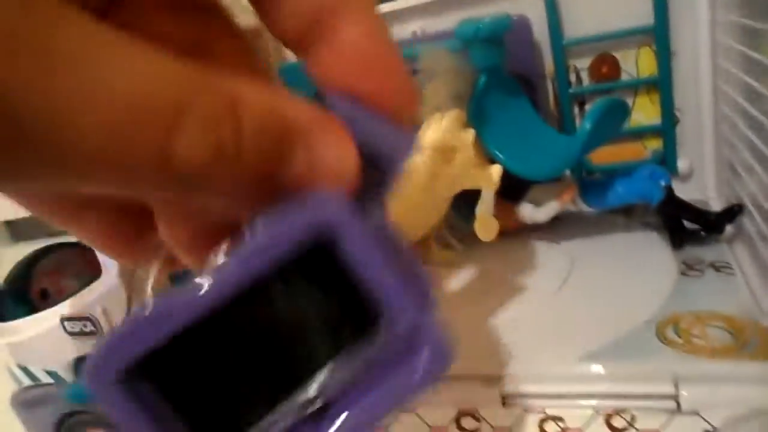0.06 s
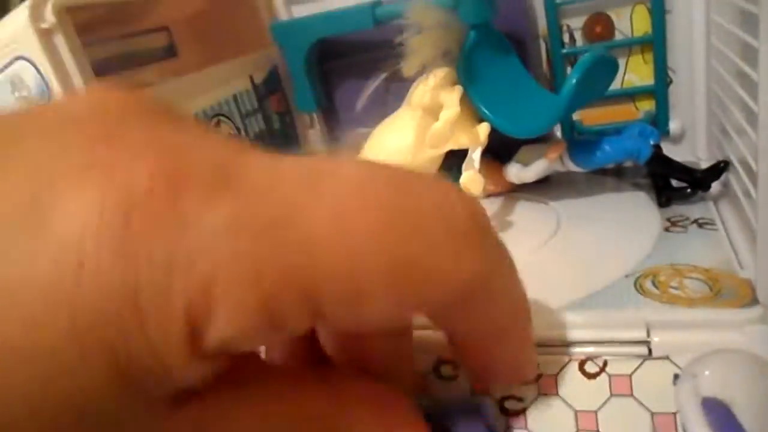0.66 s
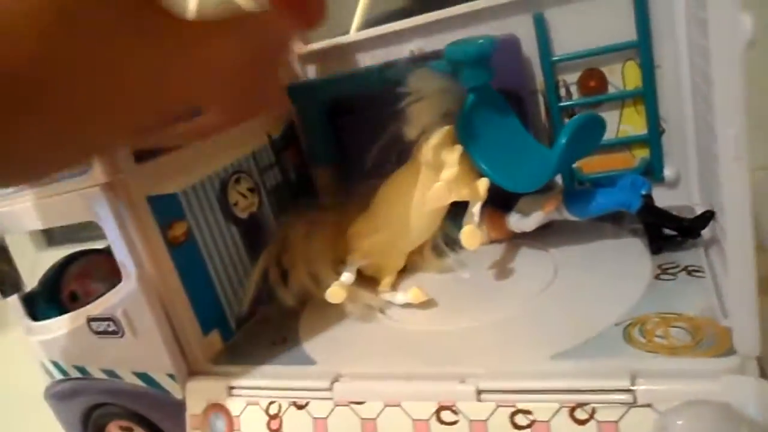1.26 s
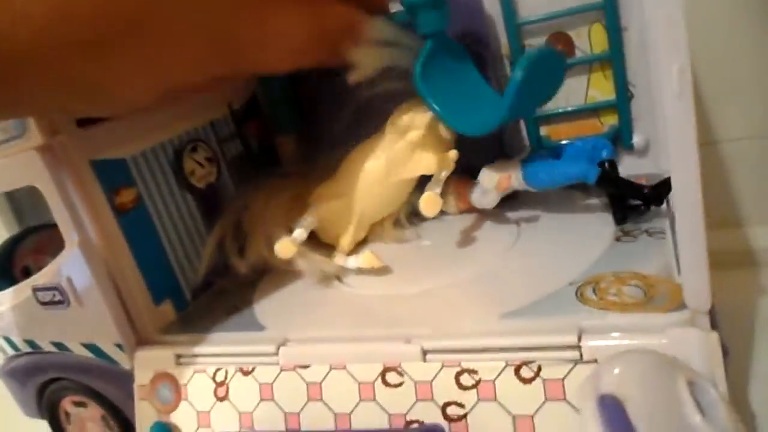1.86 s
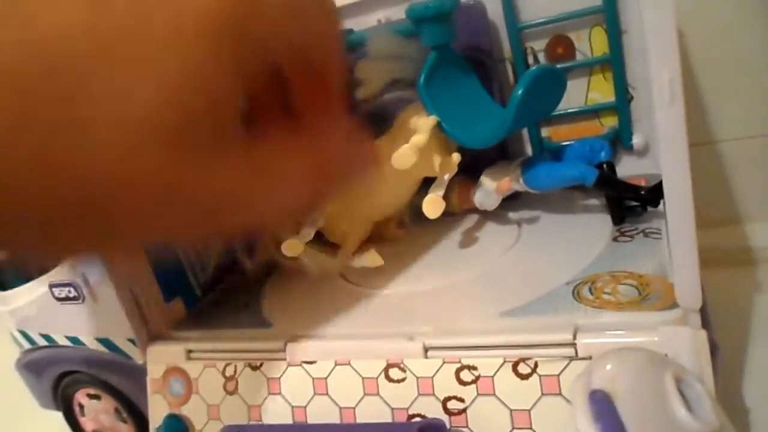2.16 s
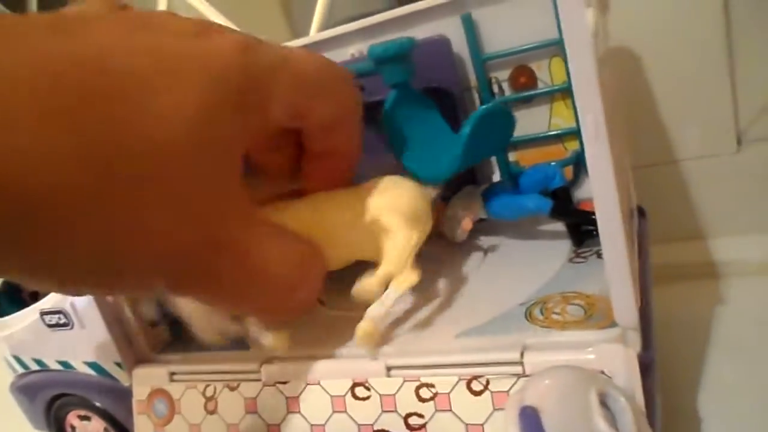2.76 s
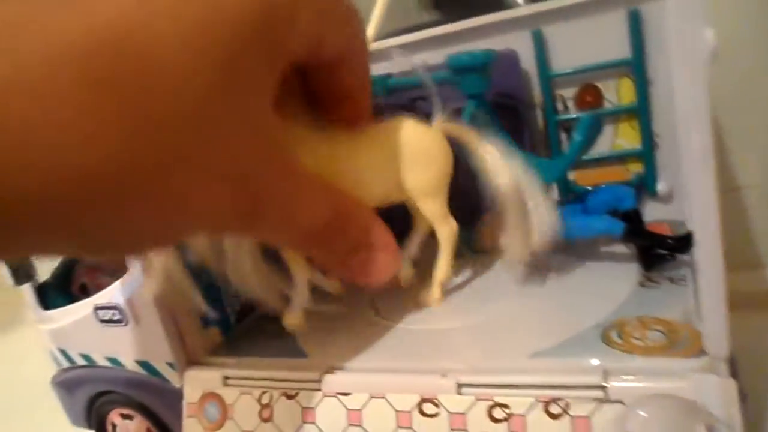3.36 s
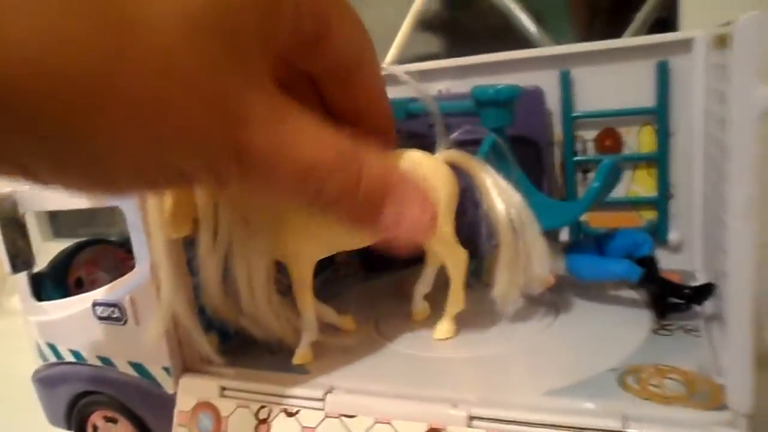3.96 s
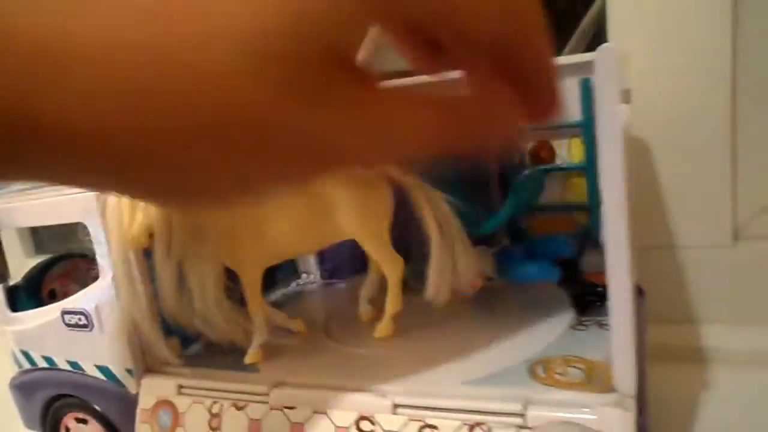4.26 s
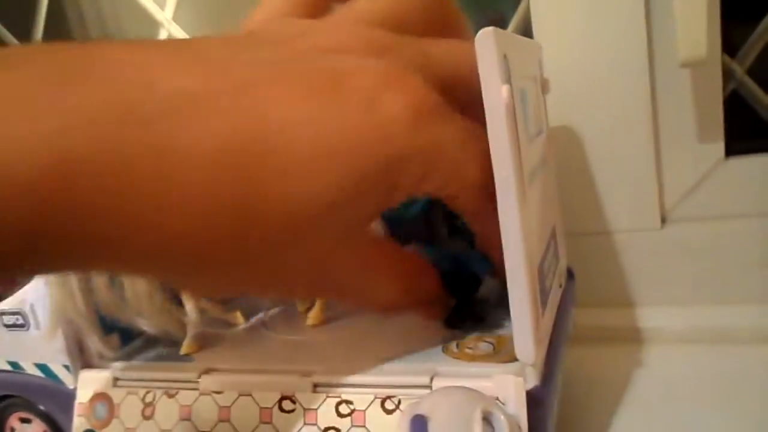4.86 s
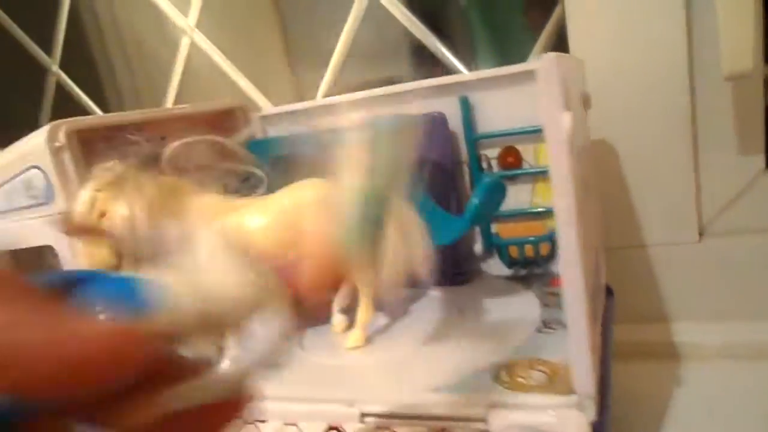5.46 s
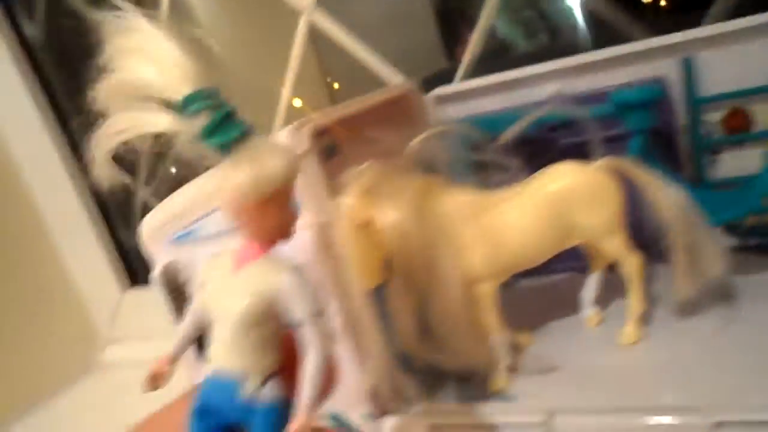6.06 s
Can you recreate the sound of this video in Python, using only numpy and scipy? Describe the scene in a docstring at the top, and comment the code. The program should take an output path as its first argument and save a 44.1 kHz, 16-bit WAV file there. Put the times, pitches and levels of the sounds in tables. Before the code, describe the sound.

Hard plastic toys click, knock and scrape lightly in short clusters as a hand moves them inside a hollow toy trailer.

```python
"""A small room, the microphone close to a hollow plastic horse trailer in which a hand moves toys about.
A small part clicks and drops, a toy horse scrapes and is stood on the trailer floor, a doll is lifted out.
Each contact rings the plastic's modes under a short crack; dragged plastic sticks and slips.
Faint room noise and the camera's focus motor lie underneath. Near the end a thin hiss comes in,
and the camera is swung and rumbles."""
import sys
import numpy as np
from scipy import signal
from scipy.fft import rfft, irfft
from scipy.io import wavfile

SR = 44100
rng = np.random.default_rng(int(sys.argv[2]) if len(sys.argv) > 2 else 0)


def wrap_up_sound(samples):
    """Save the sound to the file named by the first command line argument, as 16-bit audio."""
    columns = np.atleast_2d(samples).T
    # keep every value between -1 and 1, then stretch to whole-number steps
    tamed = np.clip(columns, -1, 1)
    steps = np.round(tamed * 32767).astype(np.int16)
    wavfile.write(sys.argv[1], SR, steps)


N = 273856
PIVOT_HZ = 1000  # hardness tilts the tone about this pitch

# the four registers of a blow, thud to tick: low_hz, high_hz
REGISTERS = [(150, 600), (600, 1500), (1500, 3500), (3500, 15000)]
# modes of the hollow trailer: pitch_hz, level_db, t60_s
TRAILER_MODES = [(164.3, -23.5, .14), (228, -19.5, 0.21), (274, -18.5, 0.21), (304, -9.5, 0.093),
                 (377.5, -4.5, 0.14), (423, 1.5, 0.099), (495, -7, 0.084), (537.3, -8.5, 0.15),
                 (612, -10.5, 0.039), (723, -4.5, 0.059), (898, -4.5, 0.054), (962, -6, 0.055),
                 (1138, -17, 0.12), (1278, -9, 0.055), (1650, -31, 0.046), (2115, -18, 0.026),
                 (2490, -23.5, 0.024), (2960, -27.5, 0.015), (4200, -11.5, 0.021), (5440, -20, 0.019)]


def gain_of(db):
    """Decibels to amplitude."""
    return 10 ** (np.asarray(db) / 20)


def unit_rms(x):
    """Scales to rms 1."""
    return x / np.sqrt(np.mean(x ** 2) + 1e-20)


def value_at(points, hz):
    """Reads a table on a log-frequency axis."""
    point_hz, value = np.transpose(points)
    return np.interp(np.log(hz + 1), np.log(point_hz + 1), value)


def add(mix, start_s, sound):
    """Mixes a sound in at start_s."""
    part = mix[round(start_s * SR):][:len(sound)]
    part += sound[:len(part)]


def coloured(x, colour):
    """Gives x a spectrum, at rms 1."""
    hz = np.fft.rfftfreq(len(x), 1 / SR)
    return unit_rms(irfft(rfft(x) * gain_of(value_at(colour, hz)), len(x)))


def noise(colour):
    """Steady noise of one colour, at rms 1."""
    return coloured(rng.standard_normal(N), colour)


def dying(x, colour, t60):
    """Colours x and lets every frequency die at its own speed."""
    hz, t, spectra = signal.stft(x, SR, nperseg=128)
    fade_db = value_at(colour, hz)[:, None] - 60 * t / value_at(t60, hz)[:, None]
    return signal.istft(spectra * gain_of(fade_db), SR, nperseg=128)[1][:len(x)]


def strokes(rows):
    """The gain of movements that swell from rest and come to rest again."""
    t = np.arange(N) / SR
    return sum(gain_of(db) * np.sin(np.pi / 2 * np.interp(t, (start, peak, end), (0, 1, 0)))
               for start, peak, end, db in rows)


def room_tone():
    """Faint steady room noise with two humps near 1 kHz."""
    colour = [(15, -10), (30, -6), (50, -7.5), (90, -11.5), (160, -15.5), (400, -21.5), (660, -26),
              (770, -20), (865, -14.5), (925, -27), (1050, -17), (1300, -29.5), (3000, -35), (5500, -37.5),
              (8000, -40.5), (15500, -43)]  # its spectrum: frequency_hz, level_db
    return gain_of(-64) * noise(colour)


def room_rumble():
    """The room's deep steady rumble."""
    colour = [(12, -9.5), (29, -2), (42, -11.5), (65, -13), (100, -22), (200, -34.5), (1000, -70)]  # its spectrum: frequency_hz, level_db
    return gain_of(-66.5) * noise(colour)


def focus_motor(pitch_hz=1124, step_s=0.031, until_s=5.4):
    """The lens hunts in short steps, about seven a second, each a faint whine."""
    harmonics = [(1, -77), (2, -80.5), (4, -85), (5, -85)]  # the motor's whine: pitch_multiple, level_db
    t = np.arange(round(step_s * SR)) / SR
    whine = sum(np.sqrt(2) * gain_of(db) * np.sin(2 * np.pi * k * pitch_hz * t) for k, db in harmonics)
    starts = np.cumsum(rng.uniform(.1, .17, 60))
    out = np.zeros(N)
    for start_s in starts[starts < until_s]:
        add(out, start_s, whine * signal.windows.tukey(len(t), .5))
    return out


def camera_grip():
    """Handling noise: the grip shifts briefly, and at the end the camera is swung."""
    moves = [(0.198, 0.207, 0.22, -51), (3.62, 3.78, 3.86, -61.5), (6.03, 6.18, 6.35, -50.5),
             (6.105, 6.138, 6.165, -50.5)]  # moves of the hand: start_s, peak_s, end_s, level_db
    colour = [(25, -5), (70, 2), (130, 3), (250, -8), (500, -15.5), (1200, -24.5), (5000, -36),
              (15000, -61.5)]  # their rumble: frequency_hz, level_db
    return strokes(moves) * noise(colour)


def register_levels(tone_db, strength_db, hardness_db=0, wall_db=0, wall_hz=900):
    """A harder contact tilts the tone upward; one near a thin wall rings the register around wall_hz."""
    low, high = np.transpose(REGISTERS[:len(tone_db)])
    octaves = np.log2(np.sqrt(low * high) / PIVOT_HZ)
    holds_wall = (low <= wall_hz) & (wall_hz < high)
    return strength_db + np.array(tone_db) + hardness_db * octaves + wall_db * holds_wall


def blow(modes, register_db, crack_db, early_db, rise_s):
    """One contact: the modes ring under a short crack, a crowd of short-lived wall modes."""
    crack_colour = [(100, -25.5), (220, -18), (400, 6.5), (900, -7.5), (2400, 2), (3200, -4.5), (5400, -1),
                    (6300, -13), (8000, -19.5), (11000, -32), (15000, -35.5)]  # the crack's spectrum: frequency_hz, level_db
    crack_t60 = [(300, 0.11), (1000, 0.088), (2500, 0.1), (5000, 0.023), (10000, 0.047)]  # its decay: frequency_hz, t60_s
    t = np.arange(SR // 3) / SR
    attack = t < .012
    hz, db, t60 = np.transpose(modes)[:, :, None]
    # the force has a smooth spectrum, so each register leans towards its stronger neighbour
    force = [(np.sqrt(low * high), 0.98 * (strength_db - max(register_db)))
             for (low, high), strength_db in zip(REGISTERS, register_db)]
    # every point of contact favours other modes, and the grip detunes them slightly
    weight = gain_of(db + value_at(force, hz) + rng.uniform(-3, 3, hz.shape))
    weight *= rng.choice([-1, 1], hz.shape)
    detune = 1 + 0.0058 * rng.uniform(-0.24, 1, hz.shape)
    rings = weight * np.sin(2 * np.pi * hz * detune * t) * np.exp(-np.log(1000) * t / t60)
    # a strong first swing, soon damped by the fingers and the joints
    rings *= 1 + gain_of(early_db) * np.exp(-(t / 0.0065) ** 2)
    crack = dying(coloured(rng.standard_normal(len(t)), force), crack_colour, crack_t60)
    crack *= 1 + np.exp(-t / 0.004)
    out = np.zeros(len(t))
    for (low, high), strength_db, share_db in zip(REGISTERS, register_db, crack_db):
        ring = rings[(low <= hz[:, 0]) & (hz[:, 0] < high)].sum(0)
        snap = signal.sosfilt(signal.butter(3, (low, high), "band", fs=SR, output="sos"), crack)
        # each kind of contact has its own rise time, and lower registers build up more slowly
        push = 1 - np.exp(-t / (rise_s * (PIVOT_HZ / high) ** 0.54))
        band = push * (ring / ring[attack].std() + gain_of(share_db) * snap / snap[attack].std())
        out += gain_of(strength_db) * band / band[attack].std()
    return out


def strikes(rows, tone_db, modes, crack_db, early_db, rise_s, low_cut_hz):
    """All the blows of one kind; crack_db is the crack against the ring in each register."""
    out = np.zeros(N)
    for start_s, *touch in rows:
        add(out, start_s, blow(modes, register_levels(tone_db, *touch), crack_db, early_db, rise_s))
    # panels this small radiate almost no bass
    return signal.sosfilt(signal.butter(3, low_cut_hz, "high", fs=SR, output="sos"), out)


def part_clicks():
    """Small hard parts and toy limbs click and ring briefly."""
    # the contacts: start_s, strength_db, hardness_db_per_octave, wall_ring_db
    clicks = [(0.309, -65, 2, -2), (0.3475, -71.5, 8.5, 12), (0.5575, -72, 7.5, 11.5),
              (0.7006, -77, 6.5, 4), (0.8025, -33, 0.5, 10.5), (0.8185, -45, 3, -7),
              (0.8372, -36, 0.9, 8.5), (0.8505, -50, 5, 15), (0.8548, -35.5, -2, 11), (0.927, -61, 1, -10),
              (0.9573, -33.5, -2.5, 7), (1.021, -43, -3.5, 8), (2.7055, -45.5, -1.5, -15),
              (2.738, -56, 2.2, -6), (2.8362, -49, -10.5, 21), (2.8465, -40.5, -0.5, -10),
              (3.0727, -47.5, 1, -9.5), (3.2715, -40, -3, -23), (3.279, -47, 0.1, -5.5)]
    tone = (-7, -2.5, 1, -7.5)  # balance of the registers, thud to tick: level_db
    modes = [(326, -11.5, 0.054), (457, -20.5, .04), (571, -16, 0.035), (754, -3, 0.07), (901, -2, 0.06),
             (964, -7, 0.045), (1300, -3, 0.045), (1957, -10.5, 0.039), (2330, 1, 0.017),
             (2588, -6.5, 0.081), (3146, -11, 0.036), (3380, -15.5, 0.026), (4420, -12, 0.027),
             (5166, -13, 0.0356)]  # modes of a small part lying on the trailer: pitch_hz, level_db, t60_s
    return strikes(clicks, tone, modes,
                   crack_db=(-6, -4.5, -3.5, 4.5), early_db=4.5, rise_s=0.0021, low_cut_hz=212)


def floor_scrapes(slips_per_s=2200):
    """Plastic dragged over the trailer floor sticks and slips in tiny uneven jerks."""
    drags = [(1.945, 1.977, 2.023, -51.5), (2.62, 2.72, 2.894, -51.5), (3.25, 3.268, 3.29, -54.5),
             (4.73, 4.79, 4.84, -66), (4.85, 4.9, 5.7, -72.5)]  # the drags: start_s, peak_s, end_s, level_db
    colour = [(100, -5), (330, 8.5), (900, 8.5), (1400, 0.5), (2400, -2.5), (3500, -16), (5500, -16),
              (7000, -45), (15000, -52)]  # their spectrum: frequency_hz, level_db
    slips = (rng.random(N) < slips_per_s / SR) * rng.standard_normal(N)
    friction = unit_rms(slips) + 0.31 * rng.standard_normal(N)
    return strokes(drags) * coloured(friction, colour)


def trailer_knocks():
    """Hooves and toys knock on the trailer and ring its hollow body."""
    # the contacts: start_s, strength_db, hardness_db_per_octave, wall_ring_db
    knocks = [(1.979, -50, 3.5, -0.5), (2.029, -55, 3, -1), (2.141, -30.5, 0.84, 0), (2.39, -59, 1.5, 6.5),
              (2.503, -32.5, -0.2, -10), (2.512, -34.5, 0.7, -4.5), (2.5398, -32.5, -0.1, 1),
              (2.653, -48, 2.3, -6), (2.678, -36.5, -0.7, -7.5), (2.765, -42, 2.5, -3),
              (2.77, -38, 1.1, -5), (3.6128, -21.5, 0, -4.5), (3.658, -24.5, 1.44, -5),
              (3.6622, -36, -2.5, 13), (3.675, -47.5, -6, 4), (3.801, -45, -1.4, -0.5),
              (4.616, -58, 2, 3.5), (4.837, -40, 0.5, 4.5)]
    tone = (1, -3.5, -15, -27)  # balance of the registers, thud to tick: level_db
    return strikes(knocks, tone, TRAILER_MODES,
                   crack_db=(-16, -6, -2, 9), early_db=-8.5, rise_s=0.00057, low_cut_hz=196)


def hand_bumps():
    """The hand bumps the trailer, too gently for treble."""
    bumps = [(2.302, -58), (2.473, -47), (2.796, -52), (3.3, -58), (3.463, -55.5), (3.515, -59),
             (3.757, -42), (3.922, -55), (4.159, -61.5), (4.341, -67), (4.467, -65), (4.723, -53),
             (4.784, -47.5), (4.86, -46)]  # the contacts: start_s, strength_db
    tone = (0.5, -11)  # balance of the two lowest registers: level_db
    return strikes(bumps, tone, TRAILER_MODES,
                   crack_db=(-10, -2), early_db=12, rise_s=0.0038, low_cut_hz=300)


def horse_swish():
    """A soft high swish as the horse is turned."""
    turn = [(3.425, 3.5, 3.6, -63)]  # the turn: start_s, peak_s, end_s, level_db
    colour = [(500, -14.5), (2500, -11), (4100, -14), (4800, 0.5), (5600, -13), (6600, -17), (8000, -25.5),
              (15000, -47)]  # its spectrum: frequency_hz, level_db
    return strokes(turn) * noise(colour)


def thin_hiss():
    """A thin hiss near 6 kHz comes in late and stays."""
    fade_in = [(5.44, -101), (5.5, -78.5), (6.21, -75.5)]  # its rise from silence: time_s, level_db
    colour = [(4800, -51), (5650, -6), (6000, 1.5), (6350, -9), (7500, -41)]  # its narrow band: frequency_hz, level_db
    level_db = np.interp(np.arange(N) / SR, *np.transpose(fade_in), left=-np.inf)
    return gain_of(level_db) * noise(colour)


def room_echo(x, gap_s=0.0078, reflections_per_s=2500):
    """Sparse wall reflections of random sign, each band dying at its own speed."""
    colour = [(200, -11.5), (500, -15.5), (1000, -12), (2500, -13), (5000, -12.5), (12000, -26)]  # the echo's spectrum: frequency_hz, level_db
    decay = [(200, 0.35), (500, 0.3), (1000, 0.25), (2500, 0.23), (5000, 0.25), (12000, .1)]  # its decay: frequency_hz, t60_s
    t = np.arange(SR * 3 // 4) / SR
    taps = rng.choice([-1., 1.], len(t)) * (rng.random(len(t)) < reflections_per_s / SR) * (t > gap_s)
    taps /= np.linalg.norm(taps * np.exp(-t / 0.044))
    return signal.fftconvolve(x, dying(taps, colour, decay))[:N]


def scene():
    """Close toys and their echo over the room noise and the camera's own sounds, in mono."""
    # room tone and motor dip for a while after the hardest knocks: time_s, gain_db
    dip_curve = [(3.62, 1.5), (3.72, -4.5), (4.3, -4.5), (5.301, 0.5)]
    dip = gain_of(np.interp(np.arange(N) / SR, *np.transpose(dip_curve)))
    toys = part_clicks() + trailer_knocks() + hand_bumps() + floor_scrapes() + horse_swish()
    background = dip * (room_tone() + focus_motor()) + room_rumble()
    camera = thin_hiss() + camera_grip()
    return (toys + room_echo(toys) + background + camera)[None]


def record(dry):
    """The recorder cuts off the highest treble."""
    low_pass = signal.firwin(511, cutoff=15850, window=("kaiser", 9), fs=SR)
    return signal.oaconvolve(dry, low_pass[None], "same")


dry = scene()
out = record(dry)
wrap_up_sound(out)
```